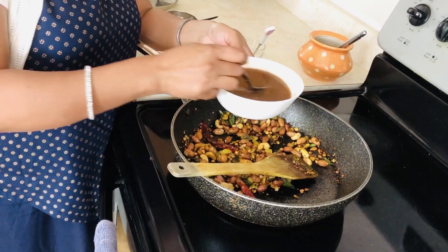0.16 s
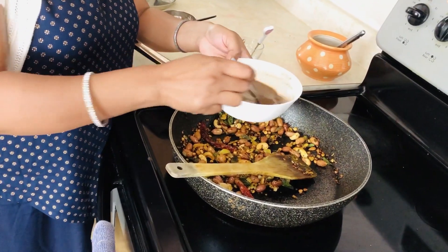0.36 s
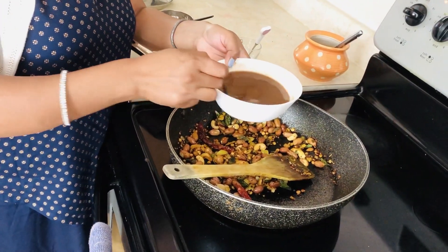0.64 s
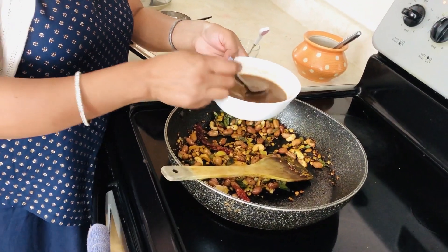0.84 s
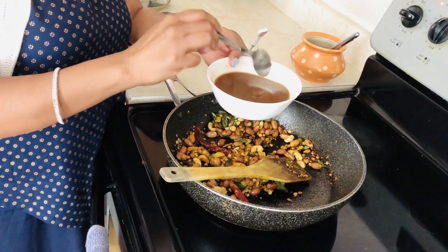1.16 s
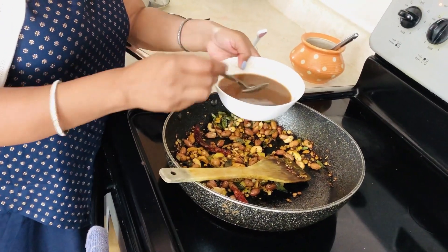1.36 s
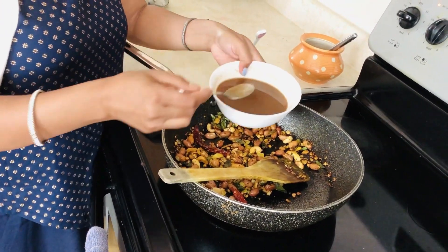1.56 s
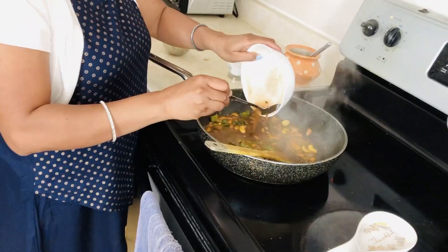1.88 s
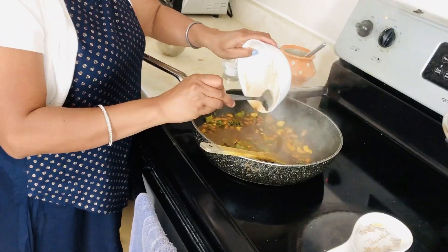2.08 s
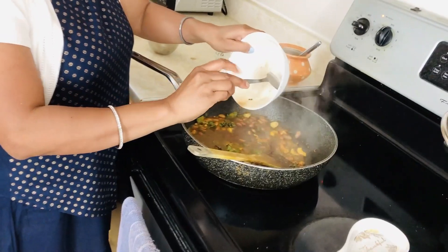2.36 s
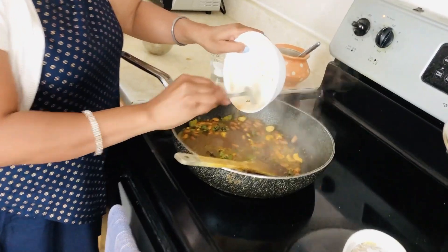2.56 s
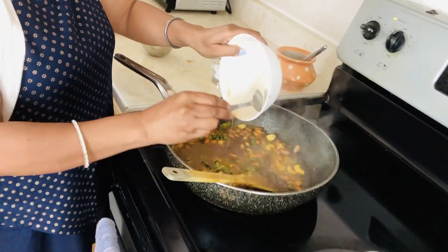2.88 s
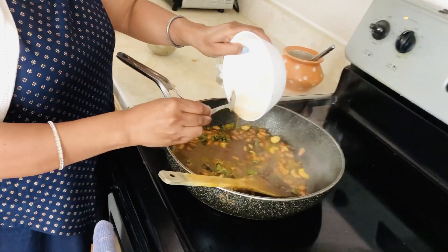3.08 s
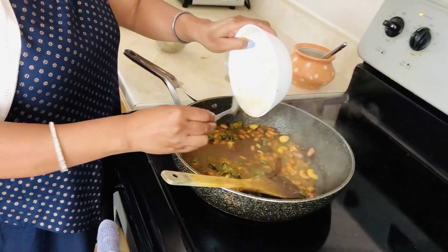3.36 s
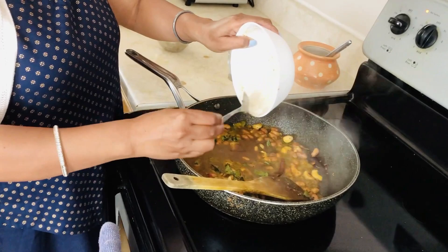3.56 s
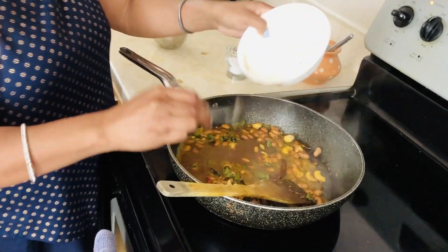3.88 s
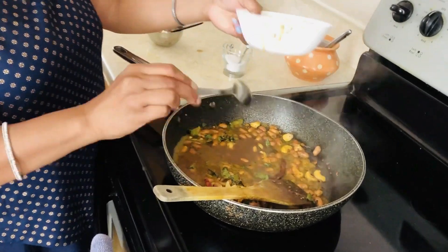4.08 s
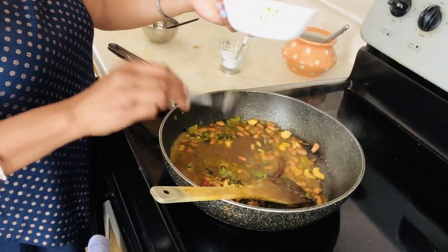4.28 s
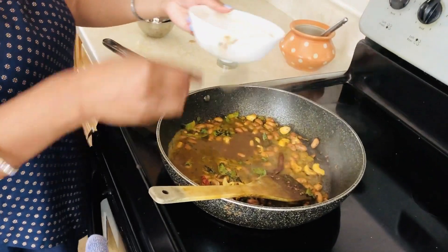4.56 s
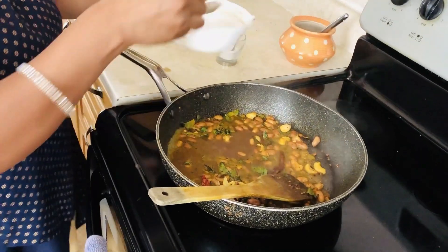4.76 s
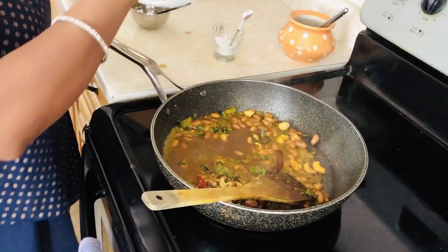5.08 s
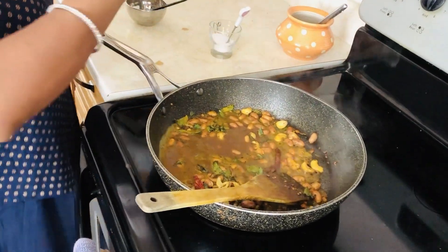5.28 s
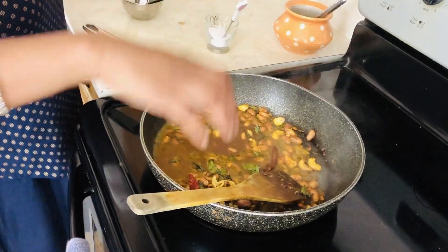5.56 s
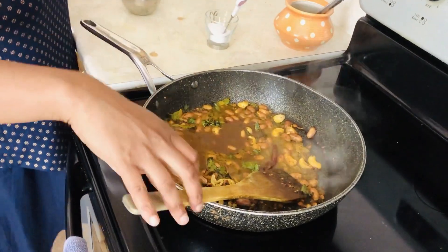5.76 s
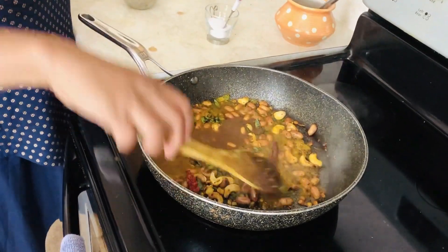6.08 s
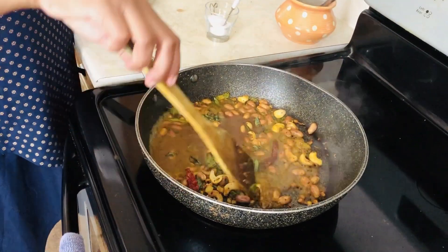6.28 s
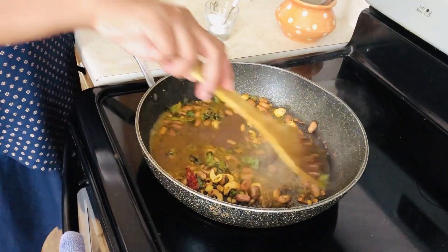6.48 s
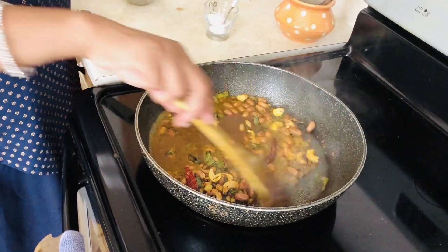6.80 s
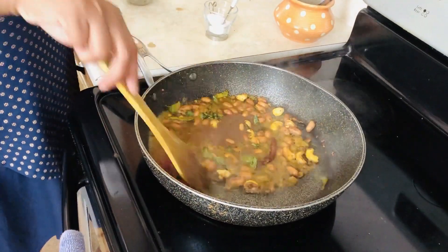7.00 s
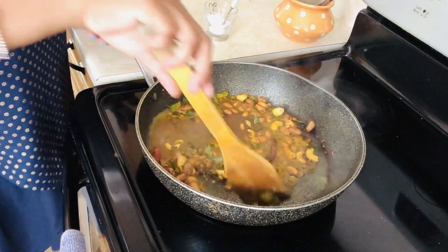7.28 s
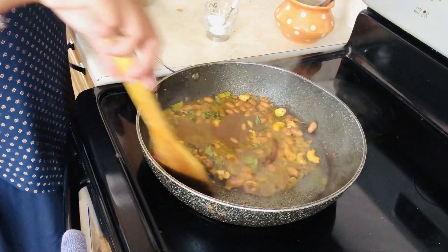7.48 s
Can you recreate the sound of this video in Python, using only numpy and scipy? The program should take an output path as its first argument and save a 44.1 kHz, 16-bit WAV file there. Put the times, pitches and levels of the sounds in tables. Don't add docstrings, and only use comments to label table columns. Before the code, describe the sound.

In a home kitchen, a steel spoon stirs a full bowl with quick damped knocks and one bright clink over soft hiss and low hum. Abruptly a dense sizzle takes over while the spoon scrapes the emptying bowl, ringing sharply. The bowl is put down with a rattle, then a wooden spatula knocks and shoves the pan amid louder frying. Close, practically mono microphone, short tiled echo.

```python
import sys
import numpy as np
from scipy import signal
from scipy.fft import rfft, irfft, next_fast_len
from scipy.io import wavfile
from scipy.ndimage import uniform_filter1d

SR = 44100
rng = np.random.default_rng(int(sys.argv[2]) if len(sys.argv) > 2 else 0)


def dump(signal):
    limited = np.clip(np.atleast_2d(signal).T, -1, 1)
    pcm = np.round(limited * 32767).astype(np.int16)
    wavfile.write(sys.argv[1], SR, pcm)


def volts_from_db(level):
    exponent = np.asarray(level, float) / 20
    return 10 ** exponent


N = 336819


def noise():
    return rng.standard_normal(N)


def unit(x):
    return x / np.sqrt(np.mean(x ** 2))


def colour(x, spectrum):
    size = next_fast_len(len(x))
    hz, db = np.transpose(spectrum)
    log_f = np.log(np.arange(size // 2 + 1) * SR / size + 1)
    gain = volts_from_db(np.interp(log_f, np.log(hz), db, -90, -90))
    return irfft(rfft(x, size) * gain, size)[:len(x)]


def band(x, lo_hz, hi_hz):
    edges = [lo_hz, min(hi_hz, SR / 2.2)]
    return signal.sosfilt(signal.butter(2, edges, "band", fs=SR, output="sos"), x)


def walk(rate):
    hold = int(SR / rate)
    steps = np.repeat(rng.standard_normal(N // hold + 1), hold)
    return 1.13 * uniform_filter1d(uniform_filter1d(steps, hold), hold)[:N]


def bubbles(per_second, spread_db):
    burst = rng.random(N) < per_second / SR
    size = volts_from_db(spread_db * rng.exponential(size=N))
    return unit(burst * np.sign(noise()) * size)


def fizz():
    out = np.zeros(N)
    for hz in 2500 * 2 ** np.linspace(0, 2.5, num=14):
        b, a = signal.iirpeak(hz, 22., fs=SR)
        out += unit(signal.lfilter(b, a, bubbles(60., 1.5))) * np.sqrt(hz / 8000)
    return unit(out)


# (from t/s, to t/s)
MOMENTS = [
    (0, 1.8716),
    (1.8716, 6.1913),
    (6.1913, 7.64),
]
# (hiss level/dB at its start, cooling/dB per s, body of the hiss: relative level/dB)
BOIL = [
    (-43, 0.27, -0.4),
    (-33.5, 0.8, 0),
    (-29.5, 0.13, 1.5),
]
# (top t/s, level/dB above the boil, below it where pulp floods, rise/s, fall/s)
FLARES = [
    (3.85, 0.5, .12, .12),
    (5.3, 0.9, 1, .35),
    (6.78, -1.4, 0.092, 0.11),
    (7.14, 4.3, .2, 0.085),
    (7.4, 1.5, 0.27, .6),
]


def effort(k):
    t = np.arange(N) / SR
    start_db, cool_db_s, body_db = BOIL[k]
    change = -cool_db_s * (t - MOMENTS[k][0])
    for s, db, rise_s, fall_s in FLARES:
        slope_s = np.where(t < s, rise_s, fall_s)
        change = change + db * np.exp(-((t - s) / slope_s) ** 2)
    return start_db + change, body_db - 0.44 * change


# (f/Hz, level/dB per Hz)
HISS = [
    [(290, -29), (500, -6.5), (545, -7.5), (761, -7), (1000, -9.5), (1260, -10.5), (1950, -10),
     (3440, -9.5), (4660, -10), (5550, -8.5), (7750, -6.5), (15100, 0.5), (16000, -23)],
    [(240, -45), (400, -13), (467, -22.5), (512, -12.5), (588, -17), (719, -11.5), (789, -13), (1380, -9),
     (2220, -8), (3580, -5.5), (5110, -5.5), (11000, -0.5), (14800, -2), (16000, -6)],
    [(240, -51), (400, -23), (460, -24), (626, -12.5), (697, -12.5), (1070, -13.5), (1160, -10.5),
     (1460, -11), (3020, -7.5), (4650, -7), (10900, -1), (15000, 0), (16000, -3)],
]


def sizzle(k, ringing):
    hiss_db, body_db = effort(k)
    boil = colour(noise() + .45 * bubbles(3000., 2.) + .22 * ringing, HISS[k])
    low = band(boil, 140.0, 4700.0)
    top = band(boil, 9100.0, 27000.0)
    mid = boil - low - top
    scale = np.std(band(boil, 5000., 15500.))
    swell_db = 0.34 * walk(9.)
    low = low * volts_from_db(body_db + 0.49 * walk(14.))
    mid = mid * volts_from_db(0.57 * walk(25.))
    top = top * volts_from_db(1.04 * walk(30.))
    return (low + mid + top) * volts_from_db(hiss_db + swell_db) / scale


# (f/Hz, level/dB per Hz)
RUMBLE = [
    [(44, -31), (75, -7.5), (91, -12), (151, -15), (251, -9.5), (392, -16.5), (458, -16.5), (546, -34),
     (762, -18.5), (900, -36), (1170, -62), (1980, -120)],
    [(44, -24), (75, -4.5), (86, -15), (108, -14), (260, -8), (367, -1.5), (464, -24), (514, -8.5),
     (700, -3.5), (910, -31), (1540, -120)],
    [(44, -36), (75, -8.5), (86, -13), (113, -3.5), (253, -9.5), (296, 1), (460, -9.5), (620, -0.5),
     (700, -7), (910, -34), (1540, -120)],
]
RUMBLE_DB = [-56, -60.5, -52.5]
# (hum level/dB, its buzz at 120 Hz: level/dB)
HUM_DB = [(-49, -64), (-67, -82), (-59.5, -75)]


def kitchen(k):
    t = np.arange(N) / SR
    hum_db, buzz_db = HUM_DB[k]
    hum = volts_from_db(hum_db + .4 * walk(6.)) * np.sin(2 * np.pi * 59.45 * t)
    buzz = volts_from_db(buzz_db + 2.5 * walk(12.)) * np.sin(2 * np.pi * 120 * t)
    rumble = unit(colour(noise(), RUMBLE[k])) * volts_from_db(RUMBLE_DB[k] + 0.9 * walk(4.97))
    return rumble + np.sqrt(2) * (hum + buzz)


def strike(blows, modes, zones, crack_db, crack_s, push_s, rough):
    out, t = np.zeros(N + SR), np.arange(SR // 4) / SR
    hz, db, t60 = (column[:, None] for column in np.transpose(modes))
    fade = volts_from_db(-60 * t / t60) * (volts_from_db(-6.5) + np.exp(-t * hz / 43))
    zones_hz, tone_db = np.transpose(zones)
    loudest_db = max(blow[1] for blow in blows)
    for s, peak_db, hard_db, square_db in blows:
        tilt_db = hard_db * (np.arange(4) - 1.5)
        zone_db = tone_db + tilt_db + square_db * np.array([-1, 2, -1, 0])
        drive = volts_from_db(db + np.interp(np.log(hz), np.log(zones_hz), zone_db))
        waver = signal.resample(rng.standard_normal((2, len(modes), 40)), len(t), axis=2)
        turn = rng.random(hz.shape) + rough * waver[0] / 4
        swing = np.sin(2 * np.pi * (hz * t + turn))
        ring = (drive * (1 + rough * waver[1]) * swing * fade).sum(axis=0)
        lowest = (hz.min() * 0.69, zone_db[0])
        highest = (min(hz.max() * 2, SR / 2.6), zone_db[-1] - 4)
        tint = [lowest, *zip(zones_hz, zone_db), highest]
        crack = colour(rng.standard_normal(len(t)), tint) * np.exp(-t / crack_s)
        crack = crack * volts_from_db(crack_db + 0.22 * (peak_db - loudest_db))
        contact = 1 - np.exp(-t / push_s)
        start = int(s * SR)
        out[start:start + len(t)] += volts_from_db(peak_db) * (ring + crack) * contact
    return out[:N]


# (f/Hz, level/dB, t60/s)
FULL_BOWL = [(1125, -0.5, 0.038), (2436, 0, .1), (2497, -3.5, 0.1), (2950, -14, .06), (3780, -3.5, 0.033),
             (4140, -5, 0.084), (4400, -11, 0.084), (5980, -7, 0.046), (6660, -3, .05), (8400, -7, .04),
             (9350, -1.5, .04), (10160, 0, .04)]
# (t/s, peak level/dB, hardness/dB a zone, how squarely the main ring is hit/dB)
STIR = [
    (.001, -25, -1, 1.7),
    (.024, -26, 2, -1.5),
    (.063, -22.5, -1.5, -1.5),
    (.0695, -17.5, 2.5, 1.2),
    (.149, -27.5, -2.3, -4),
    (.158, -31, -3.5, 3),
    (.3212, -16, -1.5, 0),
    (.385, -29, -1, -3.5),
    (.404, -27.5, 0, -2),
]


def stir():
    zones = [(990, -30.5), (2518, -10.5), (4200, -15.5), (7450, -18)]  # (f/Hz, level/dB)
    return strike(STIR, FULL_BOWL, zones, crack_db=6.5, crack_s=0.0042, push_s=0.00036, rough=0.25)


# (f/Hz, level/dB, t60/s)
BOWL_EDGE = [(754, -13.5, 0.047), (1700, -16, 0.053), (2434, -7.5, .12), (2904, -2.5, 0.1), (3260, -9, .08),
             (4050, -1, 0.042), (4180, -4, 0.085), (4400, -8.5, 0.3), (6060, -7, 0.064), (6690, -12, .05),
             (8000, -5, .06), (8200, -2, .03), (10500, -6, .04)]
# (t/s, peak level/dB, hardness/dB a zone, squareness/dB)
CLINK = [
    (.672, -30, -.8, 4),
    (.6776, -10, 1.1, -0.5),
    (.705, -25, 5, -1),
]


def clink():
    zones = [(800, -11.5), (2800, -12.5), (4200, -11.5), (6500, -15)]
    return strike(CLINK, BOWL_EDGE, zones, crack_db=10.5, crack_s=0.0016, push_s=0.00017, rough=0.27)


# (t/s, peak level/dB)
POPS = [
    (1.784, -17),
    (1.7874, -17.5),
    (3.6124, -23.5),
    (5.0074, -16),
    (5.2292, -26),
    (5.3594, -16),
]


def spits():
    clicks = np.zeros(N)
    s, peak_db = np.transpose(POPS)
    clicks[(s * SR).astype(int)] = volts_from_db(peak_db + 3)
    return band(clicks, 4300.0, 12400.0)


# (f/Hz, level/dB, t60/s)
SPOON = [(820, -5.5, 0.044), (1800, -3.5, 0.093), (3000, -3, 0.15), (4200, -5, .04), (4470, -3, 0.12),
         (6360, 3, 0.12), (7760, -18, .05), (8450, -2, 0.069), (10700, 1, .05), (11600, -3, .05),
         (13200, 6.5, 0.066)]
# (t/s, peak level/dB, hardness/dB a zone, squareness/dB)
SCRAPE = [
    (2.28, -16.5, .8, -2),
    (3.0, -14, -0.082, 1),
    (3.38, -9, -0.73, 0.63),
]


def scrape():
    zones = [(1200, -22.5), (3700, -18.5), (7300, -12.5), (12000, -14.5)]
    return strike(SCRAPE, SPOON, zones, crack_db=2.0, crack_s=0.0093, push_s=0.00052, rough=0.37)


# (f/Hz, level/dB, t60/s)
EMPTY_BOWL = [(840, -11, 0.038), (1290, -9, 0.046), (3800, -3.5, .28), (6400, -10, .04), (6820, 1.5, .08),
              (10350, -8, .05), (12400, 0, .07)]
# (t/s, peak level/dB, hardness/dB a zone, squareness/dB)
RIM = [
    (2.5735, -13.5, 1.1, -2),
    (2.6319, -17, -0.29, 2),
]


def rim():
    zones = [(1000, -18.5), (3825, -16.5), (6950, -15.5), (12250, -15.5)]
    return strike(RIM, EMPTY_BOWL, zones, crack_db=6.5, crack_s=0.0071, push_s=0.00054, rough=0.31)


# (f/Hz, level/dB, t60/s)
PAN_RIM = [(1730, -8.5, .07), (2024, -7, .04), (2560, -11, .04), (3040, -10, .06), (3860, -12.5, 0.16),
           (4380, -7, 0.055), (6500, -4.5, .08), (7720, -7.5, .06), (8480, 2, 0.082), (10250, -5, .05),
           (10920, 0, .06), (11200, 0, .06), (12030, -0.5, .05), (12700, -7, .05), (13250, -4, .06),
           (14800, -9, .04)]
# (t/s, peak level/dB, hardness/dB a zone, squareness/dB)
TAP = [
    (3.694, -7, 0.4, 0.4),
    (3.700, -14.5, -3, .4),
]


def tap():
    zones = [(1800, -16.5), (4000, -13.5), (7500, -12), (12000, -11.5)]
    return strike(TAP, PAN_RIM, zones, crack_db=4.5, crack_s=0.0044, push_s=0.00033, rough=0.36)


# (f/Hz, level/dB, t60/s)
BOWL_BASE = [(1310, -3, .04), (3654, 1.5, 0.057), (4640, -12, .05), (5790, -7, .04), (6240, -5, .04),
             (6450, -5, .04), (7100, -12, .03)]
# (t/s, peak level/dB, hardness/dB a zone, squareness/dB)
PUT_DOWN = [
    (5.0215, -15.5, 0.5, -1),
    (5.026, -18, 2, 2.2),
    (5.057, -38, -4, 6),
]


def put_down():
    zones = [(1300, -22), (3600, -11.5), (4700, -8), (6300, -13.5)]
    return strike(PUT_DOWN, BOWL_BASE, zones, crack_db=6.5, crack_s=0.0034, push_s=0.00052, rough=0.28)


# (f/Hz, level/dB, t60/s)
COUNTER = [(3030, -6, 0.22), (3270, -7, .1), (3630, -3.5, 0.16), (4230, -11, 0.11), (4550, 1.5, 0.25),
           (4630, -7, .18), (5260, -10, .06), (6430, -2, 0.088), (8500, -7.5, .08), (10900, -2, .06),
           (11100, -9, .06), (11740, -2, .08), (13630, -4, 0.064), (14100, -8, .06)]
# (t/s, peak level/dB, hardness/dB a zone, squareness/dB)
SET_DOWN = [
    (5.245, -16.5, .5, 2),
    (5.265, -20, 1, 1),
    (5.277, -21.5, .4, -2.3),
    (5.291, -22, -.7, 0),
    (5.308, -22, 1, -3),
]


def set_down():
    zones = [(3360, -15.5), (4700, -16.5), (7200, -16), (12650, -12)]
    return strike(SET_DOWN, COUNTER, zones, crack_db=4, crack_s=0.012, push_s=0.000336, rough=0.64)


# (start t/s, level/dB, centre f/Hz, held/s)
DRAG = [
    (5.93, -56, 184, 0.11),
    (6.56, -40, 160, .11),
    (6.735, -48, 200, .01),
    (6.82, -47, 105, .03),
    (6.92, -53, 184, .04),
    (7.45, -48, 125, .03),
    (7.5, -44, 255, .02),
    (7.56, -45, 230, .08),
]


def drag():
    t, out = np.arange(N) / SR, np.zeros(N)
    size = volts_from_db(1.5 * walk(50.))
    for s, db, hz, held_s in DRAG:
        rise = np.clip((t - s) / 0.013, 0, 1)
        shove = rise * volts_from_db(db - 170 * np.maximum(t - s - held_s, 0))
        rub = unit(band(noise(), hz / 1.25, hz * 1.25))
        out += shove * size * rub / (0.25 + uniform_filter1d(np.abs(rub), SR // 50))
    return out


# (f/Hz, level/dB, t60/s)
PAN = [(135.4, -4.5, 0.19), (201, -5, 0.13), (250, -2.5, 0.11), (401, -2.5, 0.058), (628, -4, 0.066),
       (820, -2.5, 0.057), (1240, 0.5, 0.036), (1510, -12, 0.037), (2700, -10, .03), (3500, 0, .03),
       (4600, -13, .03)]
# (t/s, peak level/dB, hardness/dB a zone, squareness/dB)
KNOCK = [
    (6.548, -17.5, -1.3, 2.5),
    (6.574, -18, 6.5, 0.5),
    (6.589, -26.5, -2, -5),
    (6.739, -27, -1, -1),
    (6.747, -28.5, -2.5, -1),
    (6.85, -37.5, -3.5, -1.5),
    (7.442, -19.5, .3, -.5),
    (7.515, -38, -2.7, 1),
]


def knock():
    zones = [(180, -14.5), (600, -8), (1350, -13.5), (3500, -25.5)]
    return strike(KNOCK, PAN, zones, crack_db=15, crack_s=0.0073, push_s=.0015, rough=0.44)


def room(x):
    t60_s, level_db = 0.25, -10.5
    t = np.arange(SR // 2) / SR
    tail = band(rng.standard_normal(len(t)), 90., 9300.0) * volts_from_db(-60 * t / t60_s) * (t > .006)
    tail = tail / np.sqrt(np.sum(tail ** 2))
    return x + volts_from_db(level_db) * signal.fftconvolve(x, tail)[:N]


def scene():
    t, ringing = np.arange(N) / SR, fizz()
    steady = np.zeros(N)
    for k, (begin, end) in enumerate(MOMENTS):
        now = (t >= begin) & (t < end)
        steady += now * (sizzle(k, ringing) + kitchen(k))
    hits = stir() + clink() + scrape() + rim() + tap() + put_down() + set_down() + knock()
    echoing = room(band(hits, 95.0, 20000.) + spits())
    return np.tile(steady + drag() + echoing, (2, 1))


def stray_bands(mono, top_hz):
    per_second, low_hz, width = 5.5, 4700, 1.15
    side, size = np.zeros(N), 2048
    hop = size // 2
    f = np.arange(hop + 1) * SR / size
    for when, where in rng.random((int(per_second * N / SR), 2)):
        start = 280 + hop * int(3 + when * (N // hop - 6))
        lo_hz = low_hz + where * (top_hz / width - low_hz)
        other = rfft(mono[start - size:start]) * (f > lo_hz) * (f < lo_hz * width)
        side[start:start + size] += volts_from_db(-.5) * irfft(other) * np.kaiser(size, 6.)
    return side


def low_pass(x):
    return signal.sosfilt(signal.butter(12, 17020, fs=SR, output="sos"), x)


def record(dry):
    top_hz = 15850
    mono = signal.sosfilt(signal.ellip(10, .2, 60, top_hz, fs=SR, output="sos"), dry[0])
    side = stray_bands(mono, top_hz)
    return low_pass(mono + np.array([side, -side]))


dry = scene()
out = record(dry)
dump(out)
```